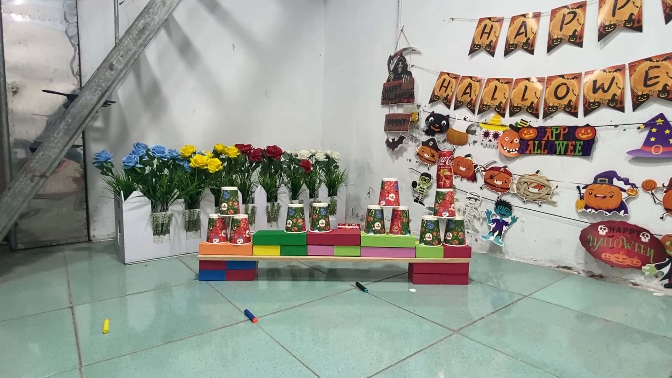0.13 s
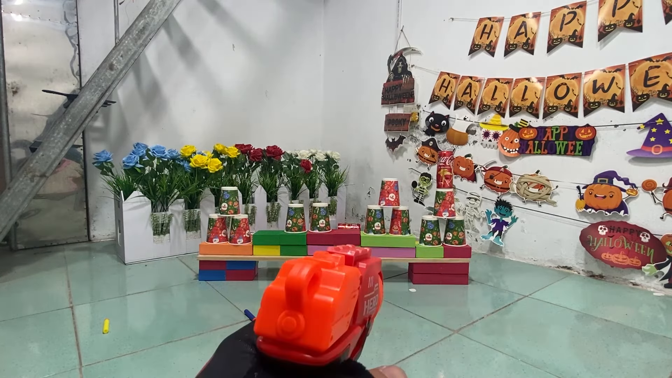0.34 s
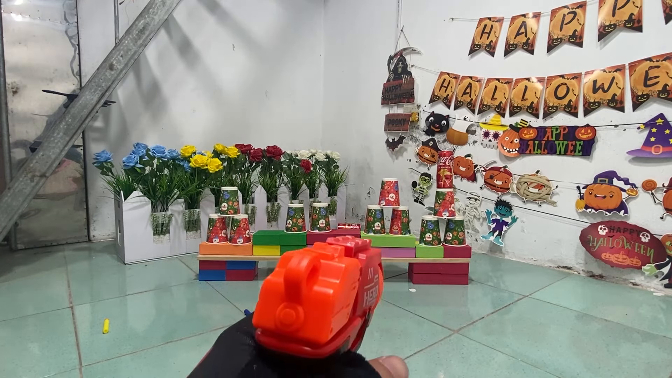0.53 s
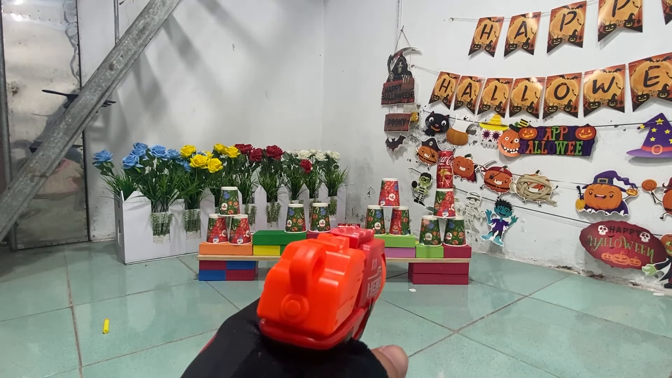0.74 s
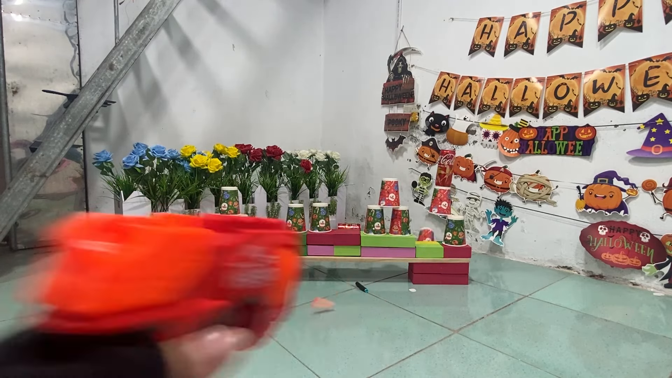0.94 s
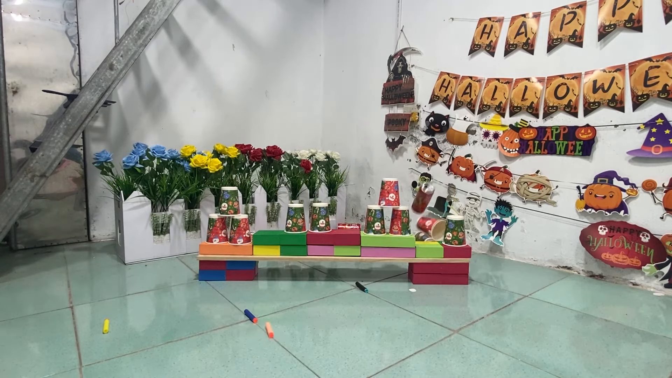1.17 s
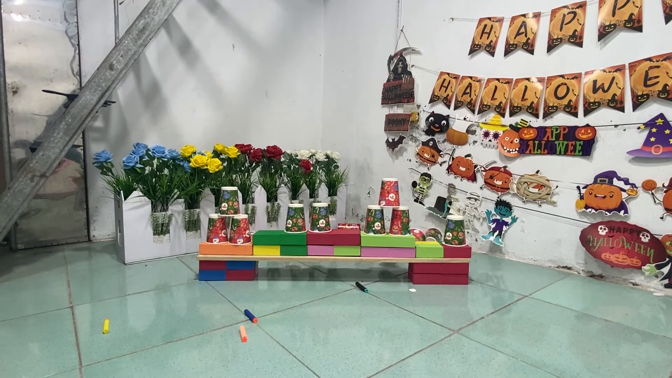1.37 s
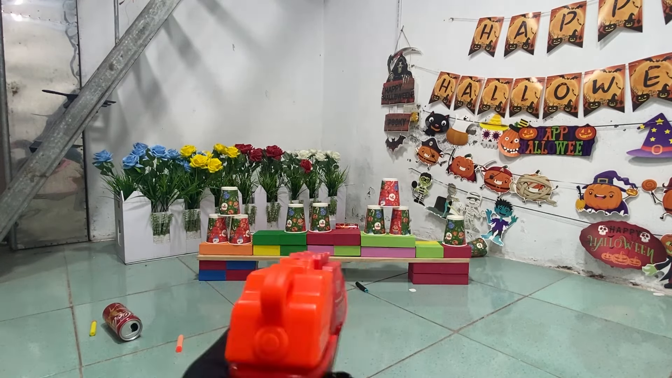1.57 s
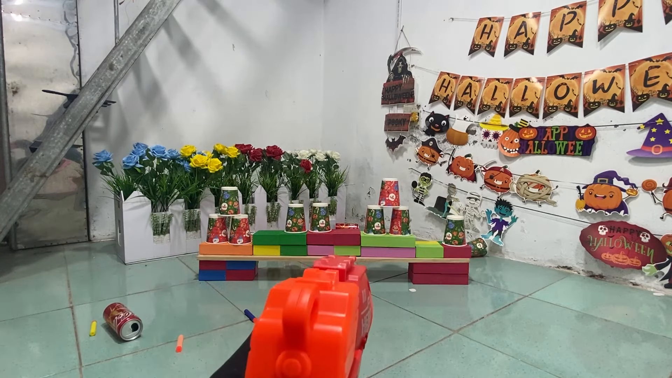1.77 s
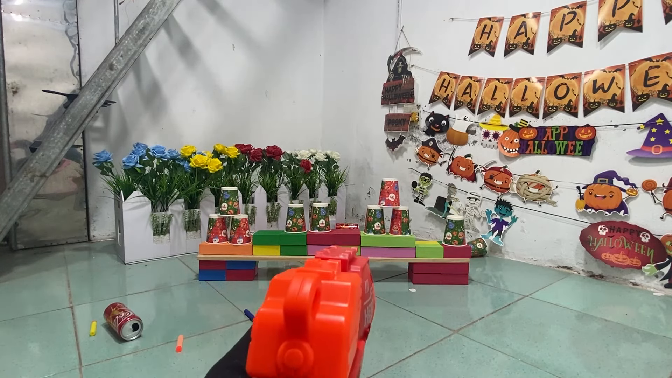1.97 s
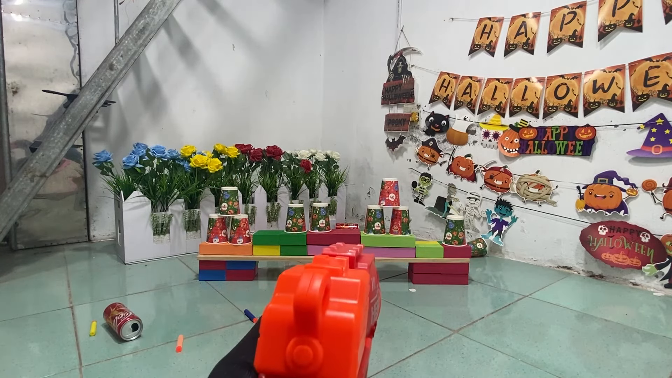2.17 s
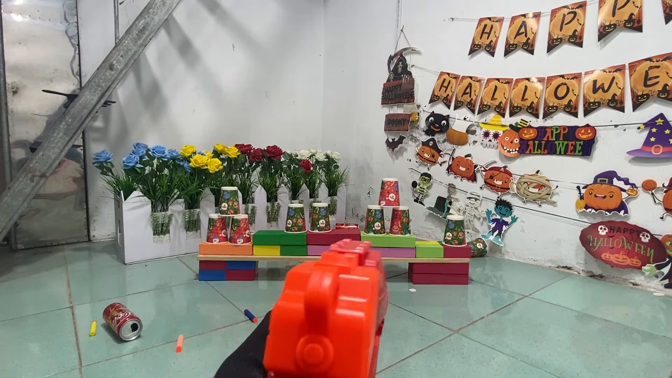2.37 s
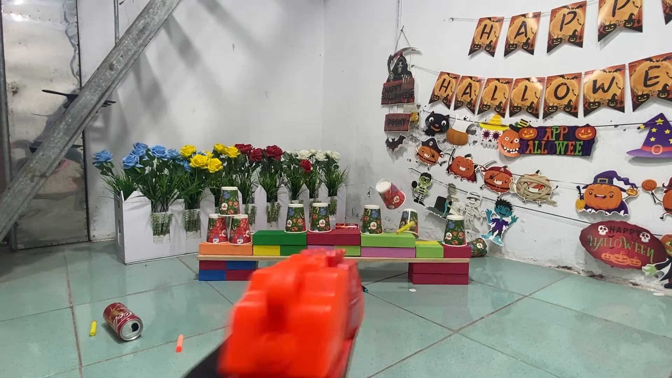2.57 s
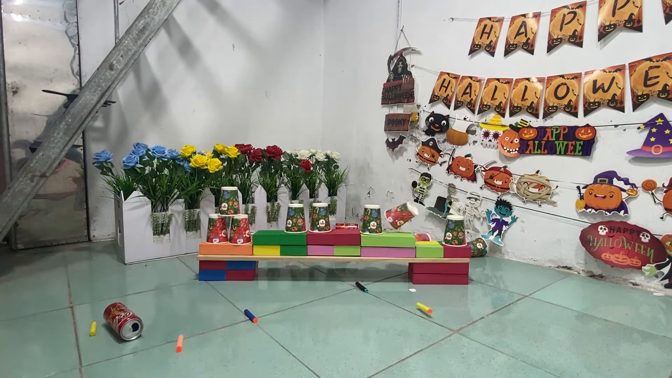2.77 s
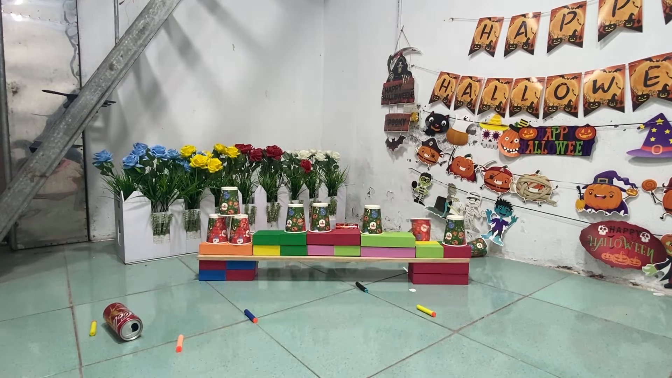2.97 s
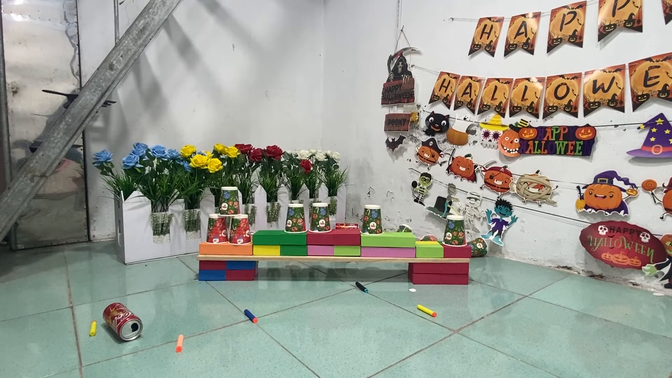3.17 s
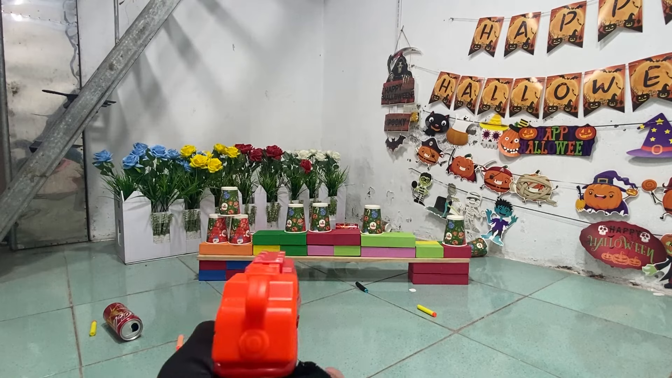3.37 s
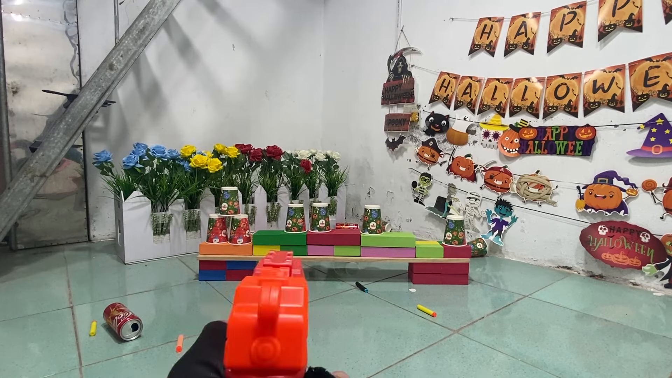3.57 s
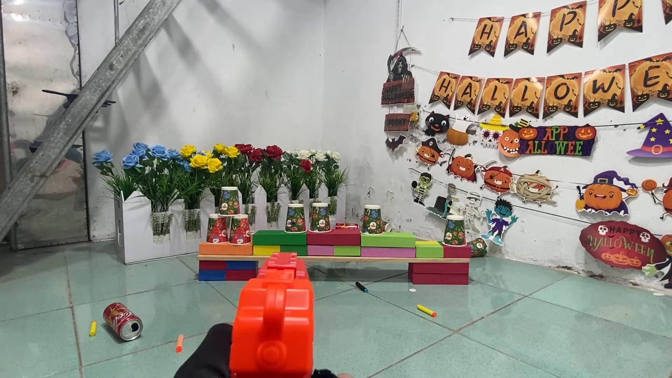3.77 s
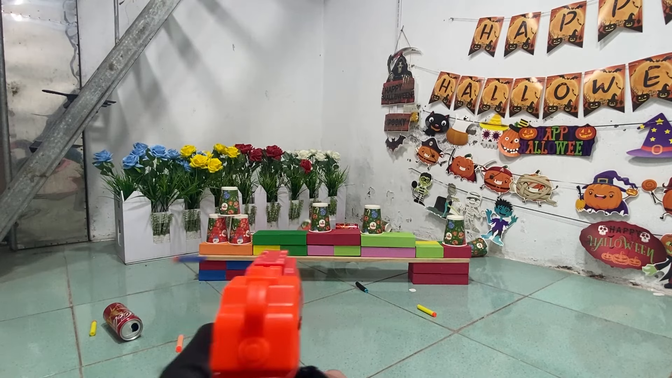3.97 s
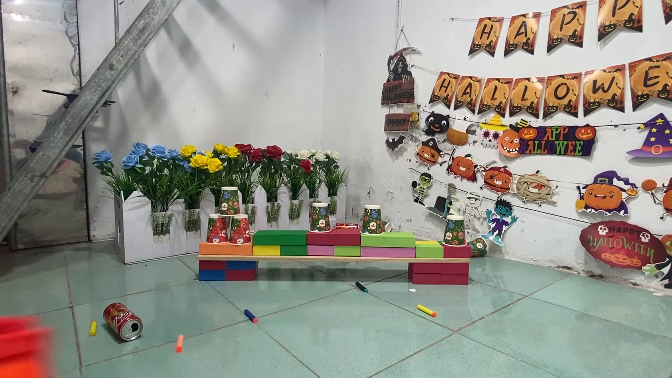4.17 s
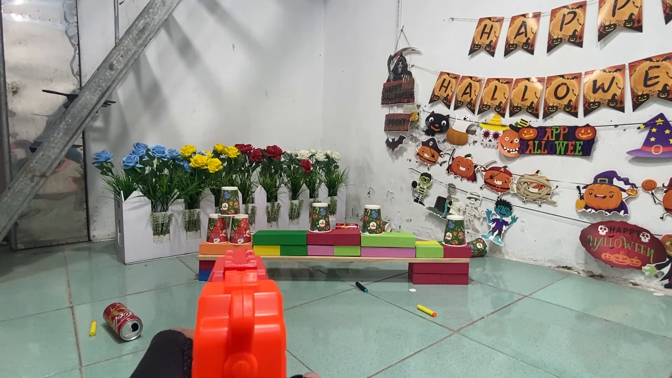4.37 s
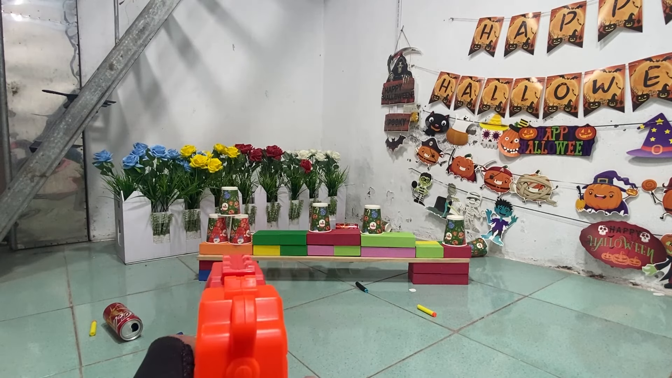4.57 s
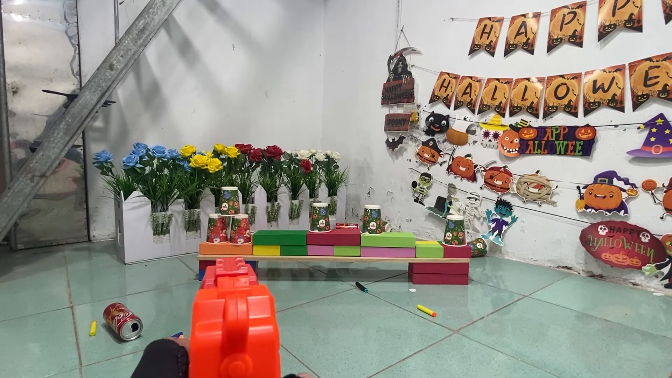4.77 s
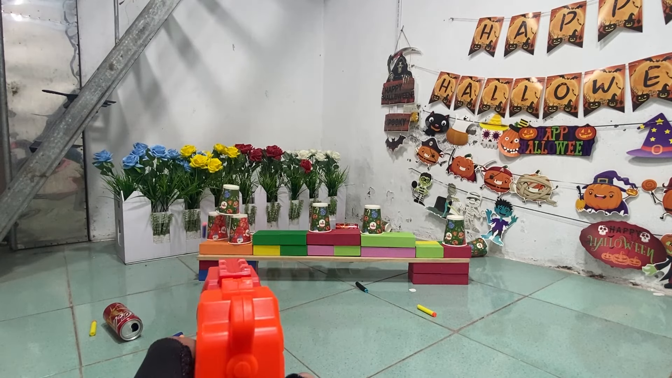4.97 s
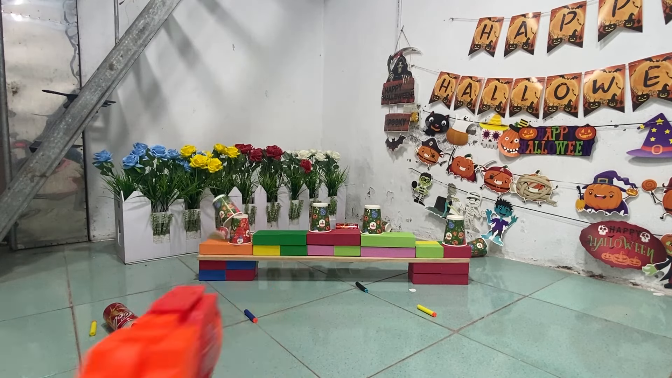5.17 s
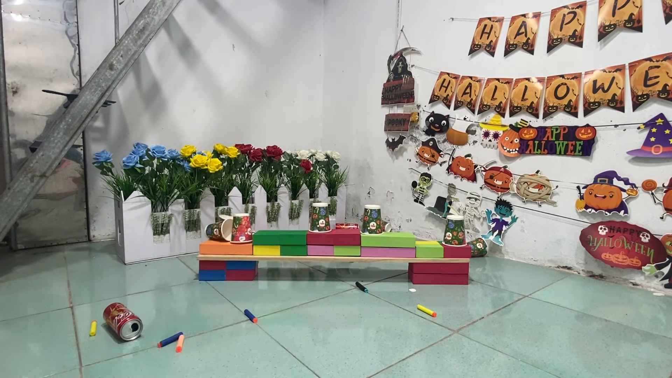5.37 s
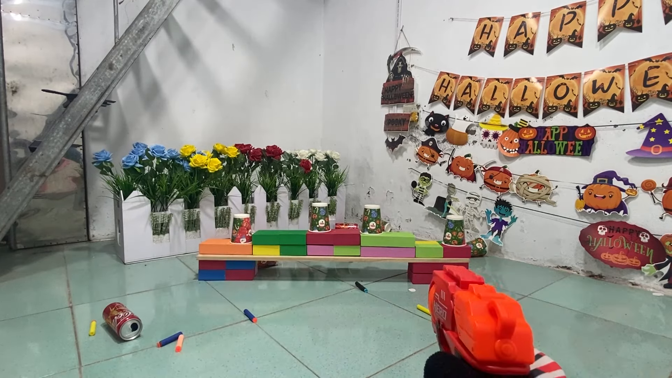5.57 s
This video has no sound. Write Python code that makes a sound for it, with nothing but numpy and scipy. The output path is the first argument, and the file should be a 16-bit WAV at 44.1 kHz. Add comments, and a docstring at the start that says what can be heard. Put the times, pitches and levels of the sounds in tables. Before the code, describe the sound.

Close stereo sound in a live, tiled room: brief tinny can clatter, then four loud plastic snaps from a spring toy blaster. About a tenth of a second after each shot, a soft dart knocks distant paper cups, which tock and bounce. A sharp can clank follows the first tumble. Abrupt edits chop off the ringing.

```python
"""An empty drink can clatters on tiles, then a spring toy blaster fires four foam darts close to the microphone.
In a bare tiled room each dart knocks paper cups off a low shelf; they tumble with hollow tocks.
Can, cups and shell are decaying modes plus coloured noise bursts, carried by reflections and a diffuse tail.
Five short moments follow each other with hard splices, so the ringing of the room stops at each splice."""
import sys
import numpy as np
from scipy import signal
from scipy.fft import rfft, irfft
from scipy.io import wavfile
from scipy.ndimage import uniform_filter1d

SR = 44100
rng = np.random.default_rng(int(sys.argv[2]) if len(sys.argv) > 2 else 0)


def file_out(sig):
    """Save sig as 16-bit WAV at sys.argv[1]."""
    # one column per channel
    cols = np.atleast_2d(sig).T
    # limit, then scale
    lim = np.clip(cols, -1, 1)
    pcm = np.round(lim * 32767).astype(np.int16)
    wavfile.write(sys.argv[1], SR, pcm)


N = 247401
RING = np.arange(27000) / SR  # time axis of one hit, s
TOP_HZ = 14450  # the recorder passes nothing above this

# splices that bound the five moments [t/s]
SPLICE_TIMES = [0, .363, 1.630, 3.298, 4.432, 5.7]
# reverberation of the room [f/Hz, t60/s]
ROOM_DECAY = [(100, 0.42), (400, 0.99), (1100, 0.82), (2800, 0.57), (6000, 0.43), (13000, 0.037)]
# outline of the quiet room tone [f/Hz, relative density/dB]
ROOM_TONE_COLOUR = [(25, -10.5), (65, -1), (110, -4.5), (170, -17), (222, -4), (280, -22), (480, -21.5),
                    (750, -29), (1600, -34), (4000, -40.5), (14000, -59.5)]
# room tone in each of the five moments [level/dB]
ROOM_TONE_LEVELS = [-70.5, -68, -65, -62, -61]

# the can strikes the tiles hard [t/s, crack level/dB, crack treble/dB, ring level/dB, favoured mode f/Hz]
CAN_STRIKES = [(0.025, -28.5, -12, -32.5, 1030), (.087, -23, -2, -29.5, 1020),
               (0.115, -31, -7.5, -28.5, 980), (.232, -30, -16, -29.5, 1040), (1.4, -14.5, 7.5, -16.5, 815),
               (1.468, -21, -11, -21, 860)]
# between strikes it chatters from end to end [start t/s, end t/s, ring level/dB, fading/(dB/s)]
CAN_CHATTER = [(0, 0.366, -28.5, 3), (1.421, 1.63, -32, 72.5)]
# modes of the thin can [f/Hz, level/dB, t60/s]
CAN_METAL_MODES = [(244.9, -16.5, 0.53), (692, -12.5, .12), (834.7, -7.5, 0.23), (944, 0.5, 0.059),
                   (1014, -7.5, 0.52), (1088, -2, 0.21), (1310, -4, 0.098), (1430, -9, 0.29),
                   (1650, -4.5, 0.019), (1797, -4, 0.2), (2055, -8, 0.14), (2286, -8, 0.087),
                   (2684, -9, 0.096), (3130, -13, 0.1), (3610, -14.5, .06), (3840, -9, 0.077),
                   (4860, -18, 0.06), (5160, -19, 0.055)]
# colour of the can's crack [f/Hz, level/dB]
CAN_CRACK_COLOUR = [(50, -34), (130, -19.5), (250, -8.5), (500, -11.5), (900, 3.5), (1600, 4), (2600, 0),
                    (4500, 0.5), (7000, -3.5), (10000, -9), (14500, -18)]
# chatter contacts are dull: crack against ring in dB, crack treble in dB, favoured mode in Hz
CHATTER_CRACK_DB, CHATTER_TREBLE_DB, CHATTER_HZ = 0, -15, 950
# cups and can lie slightly to the left, each contact its own way (left minus right, dB)
TARGET_PAN_DB, PAN_SCATTER_DB = 1.5, 1.5

# shots [t/s, catch level/dB, plunger stroke/s, slam level/dB, shell treble/dB, lag of right channel/s]
SHOT_LIST = [(0.7241, -12.5, .011, -11, 1.5, .0055), (2.4362, -12.5, .012, -13.5, 3.5, -.003),
             (3.7736, -23, .0072, -11, -1.5, -.0004), (4.9156, -16, 0.012, -11.5, 3, .003)]
# colour of the blaster's plastic shell [f/Hz, level/dB]
SHELL_COLOUR = [(150, -18.5), (300, -9), (500, 0), (900, -6), (1400, -2), (1850, -3.5), (2500, -1),
                (3100, -9), (4000, -4.5), (6000, -10), (8000, -11), (10500, -17), (14000, -21)]
# panel modes of the shell [f/Hz, level/dB, t60/s]
SHELL_PANEL_MODES = [(1100, 6.5, 0.032), (1620, -11.5, 0.036), (2130, 4, 0.053), (2463, -1, 0.11),
                     (2760, 0, 0.022), (3630, -7.5, 0.054), (4030, -6, 0.087), (4258, -6, 0.03)]
# air in barrel and plunger tube, and a low boom that lingers in the room [f/Hz, level/dB, t60/s]
BARREL_MODES = [(63, -5.5, 0.088), (150, 2.5, 0.062), (150, -19.5, 0.58), (504.3, 3, 0.023),
                (616, -4, 0.0082), (880, 3, 0.012)]
# the air pops part way through the stroke, the slam ends it; the dart leaves with a snap
POP_SHARE, POP_DB, SNAP_DB, BLASTER_PAN_DB = .48, -14, -19, 3
# the catch snaps at once, the slam is a longer push (t60 s, rise s)
CATCH_RING_S, CATCH_RISE_S, SLAM_RING_S, SLAM_RISE_S = .022, .003, .029, .0042

# a dart strikes a cup on the shelf [t/s, hollow level/dB, hollow f/Hz, rim tick level/dB]
DART_STRIKES = [(.808, -18, 654, -28), (2.529, -24.5, 480, -57), (3.863, -21, 461, -33),
                (5.017, -20.5, 465, -34.5)]
# a cup's cavity and base [multiple of hollow f, level/dB, share of ring t60]
CUP_CAVITY_MODES = [(0.699, -15, 0.58), (.86, -5.5, 0.86), (1.001, 2.5, 1), (1.13, -8, 0.4),
                    (1.42, -18.5, 0.51)]
# flexing of the paper wall [f/Hz, level/dB, t60/s]
PAPER_WALL_MODES = [(674, -2.5, 0.037), (814.5, 0.5, 0.049), (1040, -3.5, 0.023), (1215, -1.5, 0.017),
                    (1510, 0, 0.02), (1740, 2, 0.029), (2220, -10, 0.028), (2330, -17, 0.025),
                    (2885, -24.5, 0.0067)]
# colour of the paper's crunch [f/Hz, level/dB]
PAPER_COLOUR = [(100, -40.5), (250, 1.5), (450, -4), (800, 1.5), (1200, 0.5), (1750, -4), (2600, -7.5),
                (4500, -9.5), (9000, -39.5)]
# colour of the rim's tick [f/Hz, level/dB]
RIM_COLOUR = [(400, -37), (1000, -9.5), (2200, 4.5), (4200, 2), (6000, 0.5), (8500, -6), (11000, -11.5),
              (14500, -26)]
# thump of what the cup meets [f/Hz, level/dB]
THUMP_COLOUR = [(30, -24), (70, -14.5), (130, -3.5), (200, 2.5), (300, -3.5), (420, -2.5), (700, -1),
                (2000, -54.5)]
# the soft dart dents the wall, thumps the shelf and damps the hollow (dB against the hollow, t60 s)
DART_WALL_DB, DART_THUMP_DB, DART_RING_S = -7, -7, .015
# then the cup is shoved against its neighbour (s after the dart, dB against the first knock)
SHOVE_S, SHOVE_DB = .014, -6
# then it wobbles on the shelf; gap and pitch are nominal, each dull bump is weaker than the last
WOBBLE_GAP_S, WOBBLE_HZ, WOBBLE_RING_S = .052, 475.6, .051
WOBBLE_DB, WOBBLE_LOSS_DB = -30, 1
WOBBLE_WALL_DB, WOBBLE_THUMP_DB = -9, -6.5  # against the hollow

# small dry clicks of the blaster's plastic as the hand shifts [t/s, level/dB]
PLASTIC_CLICKS = [(.973, -40.5), (4.206, -42.5), (4.223, -38), (5.352, -39.5)]
# their colour [f/Hz, level/dB]
CLICK_COLOUR = [(400, -34), (1200, -8), (2500, -3.5), (5200, 2.5), (8000, -8.5), (14000, -19.5)]

# a falling cup lands: base hollow, side papery, rim a tick
# [t/s, hollow level/dB, hollow f/Hz, paper wall level/dB, rim tick level/dB]
CUP_LANDINGS = [(1.039, -42, 642, -34.5, -45.5), (1.126, -27.5, 575, -44, -46),
                (1.232, -34.5, 548, -41.5, -47.5), (1.294, -30, 650, -24.5, -33.5),
                (1.370, -13, 565, -38, -34), (2.675, -34, 478, -36.5, -43.5),
                (2.779, -40, 497, -31.5, -41.5), (2.797, -16, 538, -25.5, -33),
                (2.895, -29.5, 530, -51, -70), (2.990, -34, 446, -35, -49),
                (3.063, -19.5, 557, -34.5, -49.5), (3.098, -17.5, 574, -41, -59),
                (3.203, -25.5, 552, -28, -49), (4.06, -30, 474, -29.5, -41), (4.245, -25, 580, -23, -32.5),
                (4.361, -24, 554, -44, -44), (5.216, -27, 451, -25, -45.5), (5.252, -26, 616, -39, -48),
                (5.287, -31.5, 848, -30, -44), (5.341, -25, 474, -40.5, -63),
                (5.354, -24, 443, -31.5, -46.5), (5.391, -24, 404, -46, -65), (5.519, -18, 774, -21, -32.5),
                (5.529, -12.5, 553, -20.5, -39.5)]
# ring t60 in s, floor thump against the wall in dB
LANDING_RING_S, LANDING_THUMP_DB = .047, -6
# the cup rocks on its base: nominal first gap, shrink per gap, loss per rebound
REBOUND_GAP_S, REBOUND_SHRINK, REBOUND_LOSS_DB = .03, .78, 10.5

# faint rustle as the blaster is brought up to aim [t/s, level/dB, t60/s]
AIM_RUSTLES = [(1.98, -57.5, 1), (4.599, -64, 4.5)]
# its colour [f/Hz, level/dB]
RUSTLE_COLOUR = [(100, -19.5), (350, 5), (700, -2), (1100, -2), (1600, -34), (5000, -37), (14000, -34)]


def undb(db):
    """Decibels to gain."""
    return 10 ** (np.asarray(db) / 20)


def fade(t60):
    """Exponential decay, 60 dB in t60 seconds, over the length of one hit."""
    return np.exp(-np.log(1000) * RING / max(t60, 1e-4))


def colour(x, points):
    """Causal minimum-phase filter with the given (f/Hz, level/dB) outline."""
    hz, db = np.transpose(points)
    size = 4096
    log_bins = np.log(np.arange(size // 2 + 1) * SR / size + 1)
    cepstrum = irfft(np.interp(log_bins, np.log(hz), np.log(undb(db))))
    # fold the cepstrum forward in time, so that the filter is causal
    cepstrum[1:size // 2] *= 2
    cepstrum[size // 2 + 1:] = 0
    impulse = irfft(np.exp(rfft(cepstrum)))
    return signal.fftconvolve(np.atleast_2d(x), impulse[None], axes=1)[:, :x.shape[-1]]


def level(x, db):
    """Set the rms of the loudest hundredth of a second."""
    power = uniform_filter1d(np.mean(x ** 2, axis=0), SR // 100)
    return x * undb(db) / np.sqrt(power.max())


def add(out, x, t, pan_db=0, lag=0, after=0):
    """Mix in a sound at t + after; it ends by the first splice past t, fading there within 3 ms."""
    end = min(N, int(SR * next(s for s in SPLICE_TIMES[1:] if s > t)))
    for channel, side in enumerate((1, -1)):
        start = max(0, int((t + after - side * lag / 2) * SR))
        part = x[channel, :max(0, end - start)]
        samples_left = end - start - np.arange(len(part))
        closing = np.minimum(1, samples_left / (.003 * SR))
        out[channel, start:start + len(part)] += part * closing * undb(side * pan_db / 2)


def ring(modes, pitch=1, scatter_db=0):
    """Decaying sine modes; each blow may weight them a little differently."""
    total = 0
    for hz, db, t60 in modes:
        gain = undb(db + scatter_db * rng.standard_normal())
        total = total + gain * fade(t60) * np.sin(2 * np.pi * hz * pitch * RING)
    return total[None]


def reverb():
    """Diffuse tail for one place in the room: noise bands, the highest treble dying first."""
    hz, t60s = np.transpose(ROOM_DECAY)
    noise = rfft(rng.standard_normal((2, len(RING))))
    log_hz = np.log(np.arange(noise.shape[1]) * SR / len(RING) + 1)
    tail = 0
    for share, t60 in zip(np.eye(len(hz)), t60s):
        band = noise * np.interp(log_hz, np.log(hz), share)
        tail = tail + irfft(band, len(RING)) * fade(t60)
    return tail * (1 - fade(.006)) / np.sqrt(SR / 20)


def nearby(t60, early_db, spread=.00055):
    """Direct sound up to spread seconds late, and sparse reflections from floor and nearest walls."""
    paths = rng.standard_normal((2, len(RING))) ** 3 * fade(t60)  # cubing makes them sparse
    paths *= undb(early_db) / np.sqrt(np.sum(paths ** 2, axis=1, keepdims=True))
    direct = (rng.random(2) * abs(spread) * SR).astype(int)
    paths[[0, 1], direct] += 1
    return paths


def heard(x, paths):
    """Carry a sound along the room's paths to both channels."""
    return signal.fftconvolve(x, paths, axes=1)[:, :len(RING)]


def crunch(t60, points, near, tail, rise=.015):
    """Short burst of coloured contact noise: direct and off nearby surfaces, plus a diffuse tail."""
    push = rng.standard_normal((1, len(RING))) * fade(t60) * (1 - fade(rise))
    return colour(heard(push / np.linalg.norm(push), near) + tail, points)


def direction():
    """Left minus right level of one contact among the targets, in dB."""
    return TARGET_PAN_DB + PAN_SCATTER_DB * rng.standard_normal()


def room_tone():
    """Faint low rumble, largely alike in both channels, stepping in level at each splice."""
    moment = np.searchsorted(SPLICE_TIMES, np.arange(N) / SR, side="right") - 1
    shared = rng.standard_normal(N)
    noise = colour(shared + .62 * rng.standard_normal((2, N)), ROOM_TONE_COLOUR)
    return noise / noise.std() * undb(ROOM_TONE_LEVELS)[moment]


def clank(ring_db, favoured_hz, crack_db, treble_db):
    """One contact of the can: a noise crack and thin-metal modes, strongest near the favoured one."""
    near, tail = nearby(t60=.26, early_db=8), reverb()
    modes = []
    for hz, db, t60 in CAN_METAL_MODES:
        boost_db = 7 * np.exp(-(np.log(hz / favoured_hz) / .11) ** 2)
        modes.append((hz, db + boost_db, t60))
    metal = ring(modes, pitch=1 + .011 * rng.standard_normal(), scatter_db=4.5)
    # so small a shell radiates little bass
    metal = colour(metal, [(60, -25.5), (250, -4), (700, 2.5)])
    crack = crunch(.033, CAN_CRACK_COLOUR, near, undb(9.5) * tail)
    crack = colour(crack, [(2500, 0), (11000, treble_db)])
    return level(heard(metal, near + undb(1) * tail), ring_db) + level(crack, crack_db)


def can(count=7):
    """The empty can strikes the tiles, and chatters from end to end in uneven, fading contacts."""
    out = np.zeros((2, N))
    for t, crack_db, treble_db, ring_db, favoured_hz in CAN_STRIKES:
        add(out, clank(ring_db, favoured_hz, crack_db, treble_db), t, direction())
    for start, end, db, fading in CAN_CHATTER:
        for k, (late, force_db) in enumerate(rng.uniform(-1.2, 1, (count, 2))):
            after = (end - start) * max(0, k + late / 4) / count if k else 0
            contact = clank(0, CHATTER_HZ, CHATTER_CRACK_DB, CHATTER_TREBLE_DB)
            add(out, undb(db - fading * after + force_db) * contact, start + after, direction())
    return out


def clack(t60, rise, treble_db):
    """One blow on the plastic shell: coloured contact noise over ringing panel modes."""
    tail = colour(reverb(), [(200, .5), (1200, -7.5), (3800, 1), (7000, -2.5), (13000, 5.5)])
    near = nearby(t60=.029, early_db=-1, spread=0)
    contact = level(crunch(t60, SHELL_COLOUR, near, tail, rise), 0)
    panels = level(heard(ring(SHELL_PANEL_MODES, scatter_db=5.5), near + tail), -12)
    return colour(contact + panels, [(2500, .0065), (11000, treble_db)])


def blaster():
    """The catch snaps, the air pops the dart out, the plunger slams into the shell and rings its panels."""
    out = np.zeros((2, N))
    for t, catch_db, stroke, slam_db, treble_db, lag in SHOT_LIST:
        catch = level(clack(CATCH_RING_S, CATCH_RISE_S, treble_db), catch_db)
        add(out, catch, t, BLASTER_PAN_DB, lag)
        slam = level(clack(SLAM_RING_S, SLAM_RISE_S, treble_db), slam_db)
        add(out, slam, t + stroke, BLASTER_PAN_DB, lag)
        air = nearby(t60=.016, early_db=-10.5, spread=0) + undb(-13.5) * reverb()
        barrel = colour(ring(BARREL_MODES), [(20, -42.5), (70, .5)])
        pop = level(heard(barrel, air), POP_DB)
        # the snap is a bare impulse, so the paths themselves are its sound
        snap = level(colour(air, [(200, -2.5), (1500, -.5), (4000, -9.5), (12000, -19)]), SNAP_DB)
        add(out, pop + snap, t + POP_SHARE * stroke, BLASTER_PAN_DB, lag)
    return out


def hollow(hz, t60, tail):
    """The tock of a cup's cavity; its air takes a few cycles to swing up."""
    modes = [(ratio * hz, db, share * t60) for ratio, db, share in CUP_CAVITY_MODES]
    cavity = ring(modes) * (1 - fade(.031))
    return level(heard(cavity, nearby(t60=.24, early_db=7.5) + undb(1) * tail), 0)


def knock(tail, hz, t60, hollow_db, wall_db, thump_db, rim_db=None):
    """A knock rings the hollow, flexes the paper wall and may tick the rim, far enough off to be mostly room."""
    near = nearby(t60=.37, early_db=10.5)
    flex = ring(PAPER_WALL_MODES, pitch=1 + .028 * rng.standard_normal(), scatter_db=6)
    # the wall both rings and crunches as it dents; the crunch's tail has its channels swapped
    wall_ring = level(heard(flex, near + undb(8) * tail), -.4)
    wall_dent = level(crunch(.048, PAPER_COLOUR, near, undb(9) * tail[::-1]), -4.8)
    sound = undb(hollow_db) * hollow(hz, t60, tail)
    sound += level(wall_ring + wall_dent, wall_db)
    sound += level(crunch(.024, THUMP_COLOUR, near, tail), thump_db)
    if rim_db is not None:
        sound += level(crunch(.0018, RIM_COLOUR, near, undb(13) * tail), rim_db)
    return sound


def dart_hits(count=3):
    """The dart thumps a cup and shoves it into its neighbour; it wobbles a few times on the shelf."""
    out = np.zeros((2, N))
    for t, db, hz, rim_db in DART_STRIKES:
        for after, softer_db in [(0, 0), (SHOVE_S, SHOVE_DB)]:
            pitch_hz = hz * (1 + .061 * rng.standard_normal())
            blow = knock(reverb(), pitch_hz, DART_RING_S, db, db + DART_WALL_DB, db + DART_THUMP_DB, rim_db)
            add(out, undb(softer_db) * blow, t + after, direction())
            if after:
                tail = reverb()  # one tail serves all the wobbles
        for k, (late, detune) in enumerate(rng.standard_normal((count, 2))):
            pitch_hz = WOBBLE_HZ * (1 + .04 * detune)
            bump = knock(tail, pitch_hz, WOBBLE_RING_S, 0, WOBBLE_WALL_DB, WOBBLE_THUMP_DB)
            bump_t = t + WOBBLE_GAP_S * (k + 1 + .12 * late)
            add(out, undb(WOBBLE_DB - k * WOBBLE_LOSS_DB) * bump, bump_t, direction())
    return out


def clicks():
    """The blaster's plastic ticks right at the microphone, with hardly any room."""
    out = np.zeros((2, N))
    for t, db in PLASTIC_CLICKS:
        near = nearby(t60=.068, early_db=-5.5)
        tick = crunch(.0088, CLICK_COLOUR, near, undb(-10) * reverb(), rise=.001)
        add(out, level(tick, db), t)
    return out


def landings(count=2):
    """A cup lands, then rocks in quickening rebounds that only sound its hollow."""
    out = np.zeros((2, N))
    for t, hollow_db, hz, wall_db, rim_db in CUP_LANDINGS:
        tail, after = reverb(), 0
        thump_db = wall_db + LANDING_THUMP_DB
        add(out, knock(tail, hz, LANDING_RING_S, hollow_db, wall_db, thump_db, rim_db), t, direction())
        for k, (late, detune) in enumerate(rng.standard_normal((count, 2))):
            after += REBOUND_GAP_S * REBOUND_SHRINK ** k * (1 + .1 * np.tanh(late))
            tock = hollow(hz * (1 + .046 * detune), LANDING_RING_S, tail)
            add(out, undb(hollow_db - (k + 1) * REBOUND_LOSS_DB) * tock, t, direction(), after=after)
    return out


def handling():
    """Glove and sleeve brush softly between shots: slowly swelling noise, no diffuse tail."""
    out = np.zeros((2, N))
    for t, db, t60 in AIM_RUSTLES:
        brush = crunch(t60, RUSTLE_COLOUR, nearby(t60=.033, early_db=22), 0, rise=.14)
        add(out, level(brush, db), t)
    return out


def scene():
    """Can, shots and cups over the room tone."""
    return room_tone() + can() + blaster() + dart_hits() + clicks() + landings() + handling()


def record(dry):
    """The recorder rounds the highest peaks and cuts the top."""
    rounded = .96 * np.tanh(1.064 * dry)
    low_pass = signal.ellip(10, .2, 90, TOP_HZ, fs=SR, output="sos")
    return signal.sosfilt(low_pass, rounded)


dry = scene()
out = record(dry)
file_out(out)
```